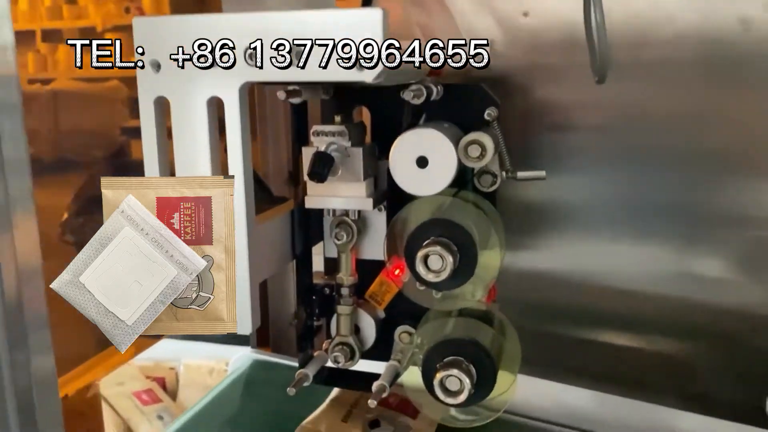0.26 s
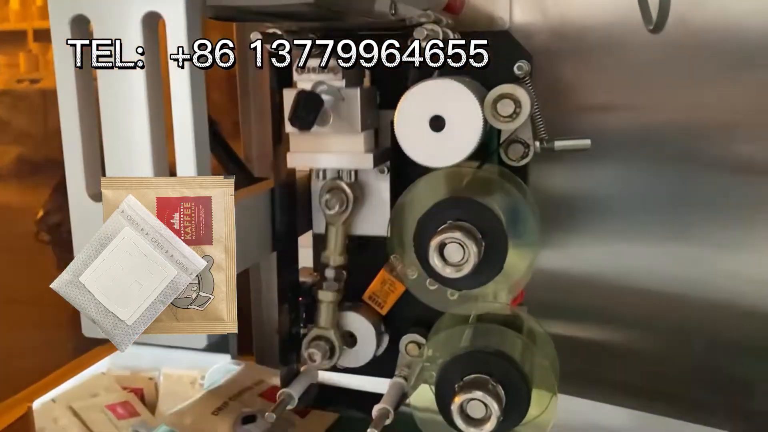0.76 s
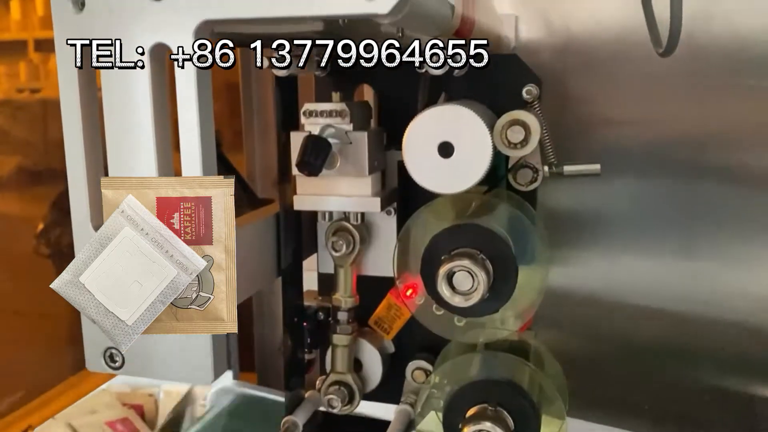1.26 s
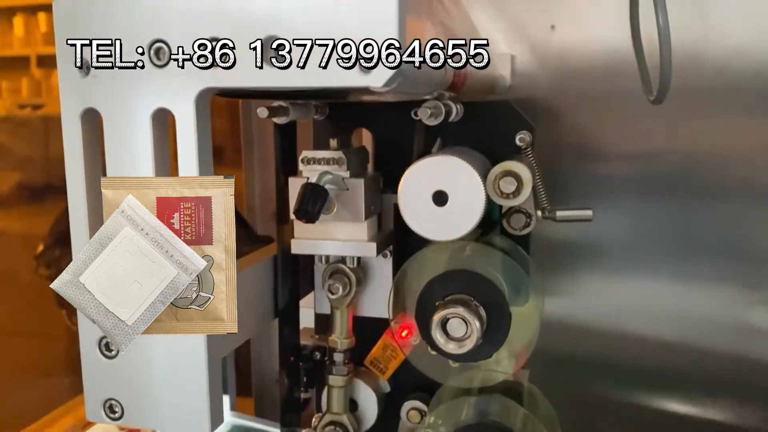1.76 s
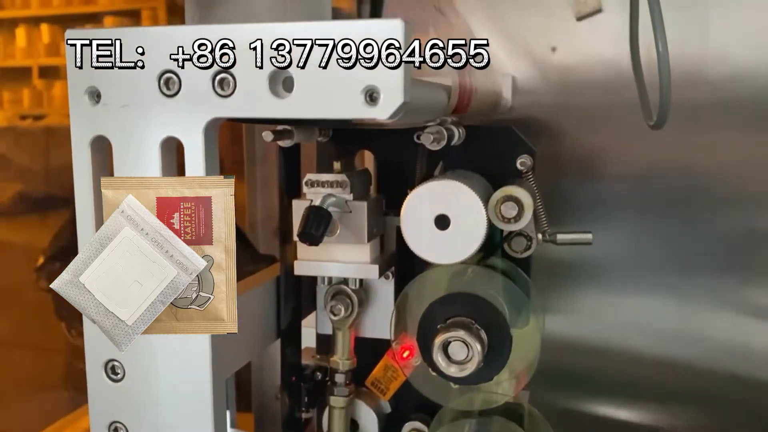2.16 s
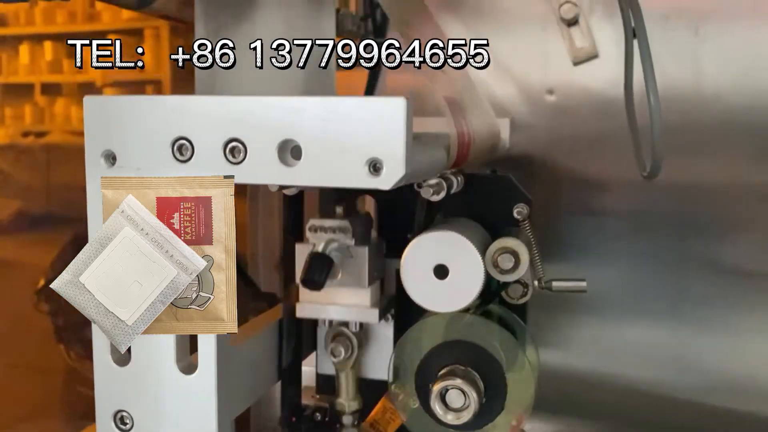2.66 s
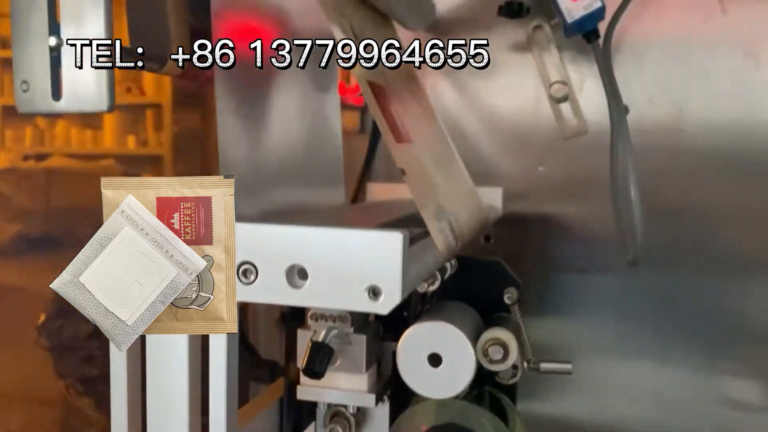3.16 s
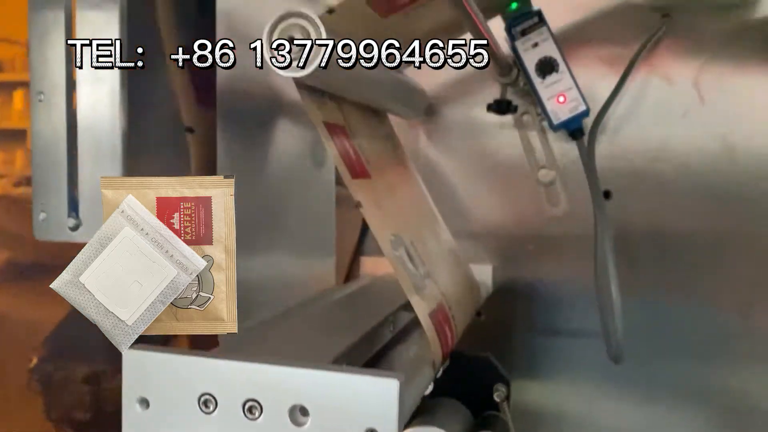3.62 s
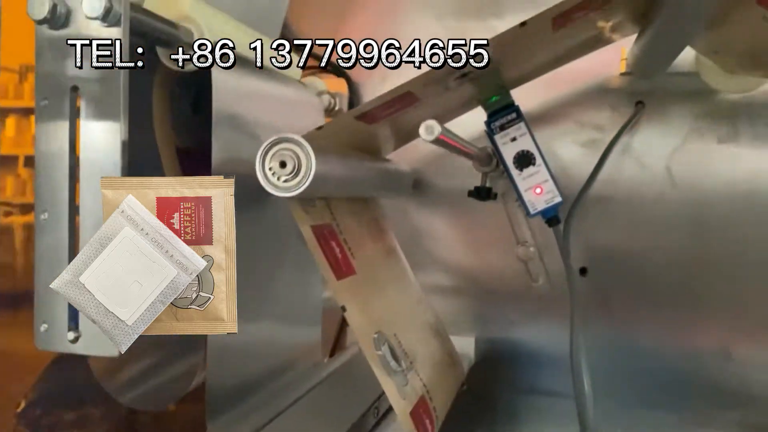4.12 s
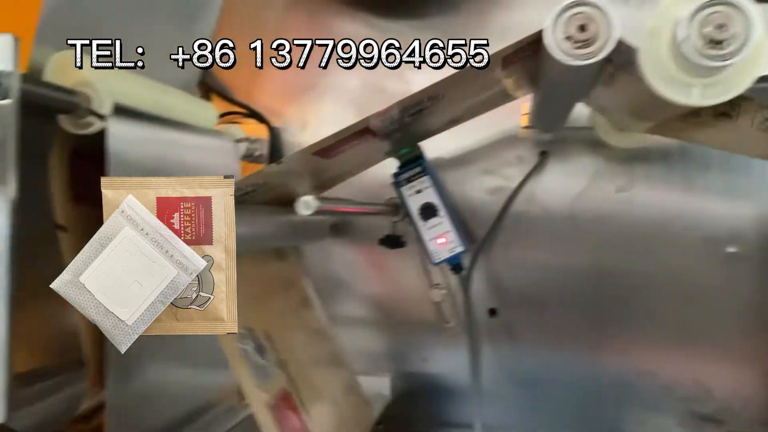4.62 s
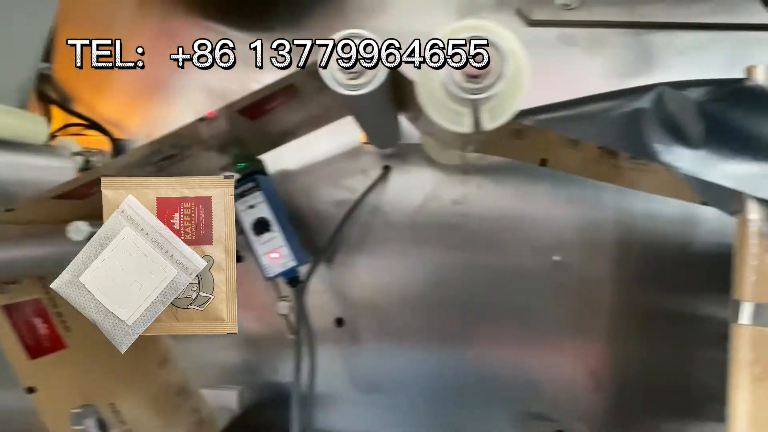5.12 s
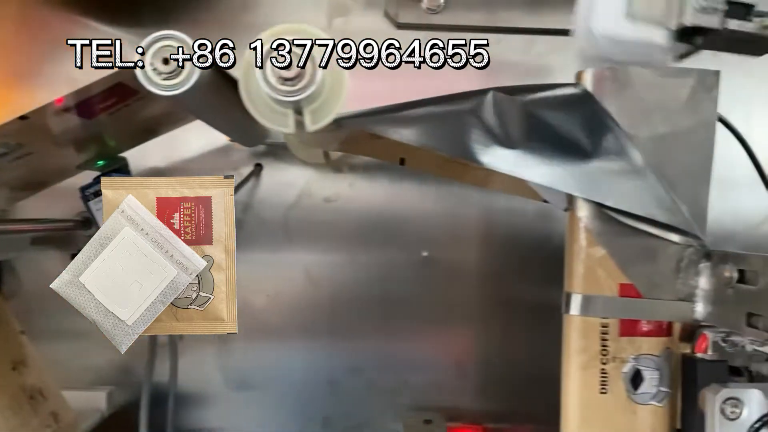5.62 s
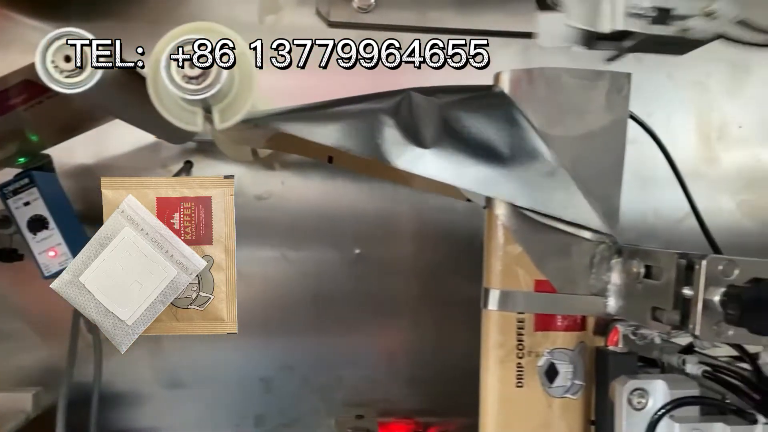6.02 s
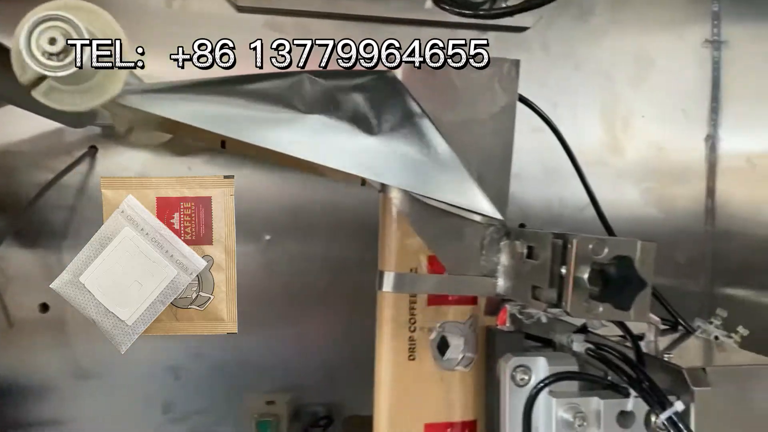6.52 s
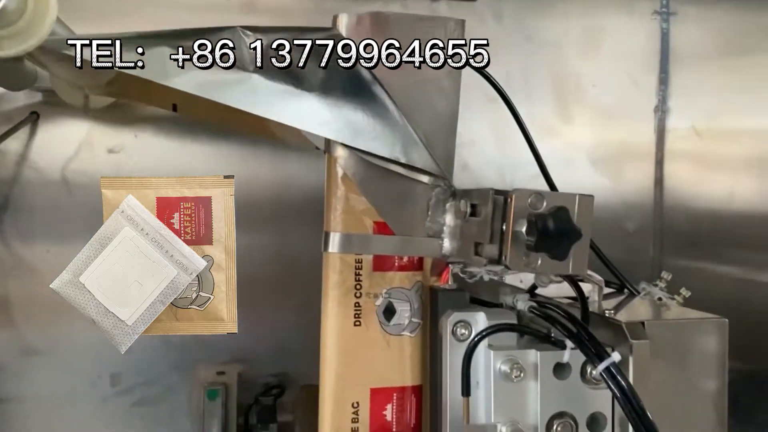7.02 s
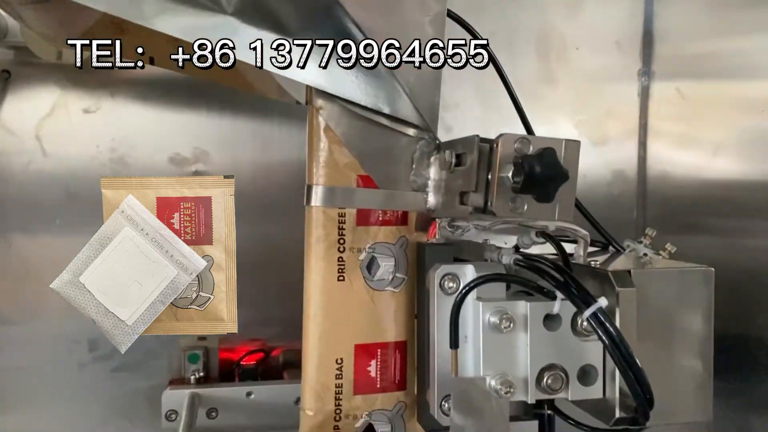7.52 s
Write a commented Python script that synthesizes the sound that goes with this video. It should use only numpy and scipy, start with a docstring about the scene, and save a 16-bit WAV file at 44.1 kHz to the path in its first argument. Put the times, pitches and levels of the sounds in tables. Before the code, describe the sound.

Close to a sachet packing machine in a workshop, a fixed cycle repeats about every 1.6 seconds. Metal jaws thump shut with a brief rattle, film rasps forward and ends in a tiny high squeal, a dry latch clack runs into a clattering linkage, then a cutter chops. Low motor hum and rumble continue beneath, with scattered light clicks and a soft air jet after every second cut.

```python
"""Sachet packaging machine

Close by in a workshop, one cycle every 1.6 s: the sealing jaws thump shut, paper film is dragged along
with a brief squeal, a latch clacks, a linkage rattles back and the cutter chops.
The drive hums and rumbles with its load; every second cycle an air jet hisses.
Blows are shaped noise plus decaying modes, with reverberation; film, drive and air are coloured noise,
hum and squeal are wavering sines."""
import sys
import numpy as np
from scipy import signal
from scipy.fft import rfft, irfft
from scipy.io import wavfile
from scipy.ndimage import uniform_filter1d

SR = 44100
rng = np.random.default_rng(int(sys.argv[2]) if len(sys.argv) > 2 else 0)


def materialize(psi):
    """Save the field psi as 16-bit PCM at rate SR to the path in sys.argv[1].

    A 1-D psi becomes a single channel; in a 2-D psi each row is a channel.
    """
    bounded = np.clip(np.atleast_2d(psi).T, -1, 1)
    quanta = np.round(bounded * 32767).astype(np.int16)
    wavfile.write(sys.argv[1], SR, quanta)


N = 343035
T = np.arange(N) / SR
HZ = np.fft.rfftfreq(N, 1 / SR)


def amp(db):
    """Decibels to gain."""
    return 10 ** (np.asarray(db) / 20)


def unit(x):
    """Scales to rms 1."""
    return x / np.sqrt(np.mean(x ** 2) + 1e-20)


def read(points, hz):
    """Interpolates a table on a log-frequency axis."""
    f, value = np.transpose(points)
    return np.interp(np.log(hz + 1), np.log(f + 1), value)


def drift(rate_hz):
    """Random wander of rms 1, mostly below rate_hz."""
    return unit(irfft(rfft(rng.standard_normal(N)) / (1 + (HZ / rate_hz) ** 4), N))


# left-right likeness, rippled by microphone spacing: f/Hz, likeness (limited to about -1..1 in use)
LIKENESS = [(30, .95), (70, 1), (130, 0.86), (280, 0.76), (450, 0.35), (750, 0.28), (1200, 0.21),
            (1580, -0.18), (2100, 0.17), (2500, .6), (3000, 0.1), (3900, -0.041), (5000, 0.29),
            (6100, 0.073), (6650, 0.86), (7400, 0.21), (8100, -1.34), (8750, -1.2), (9600, 0),
            (10050, 0.68), (10450, 1)]


def spread(mid, side):
    """Mid and side spectra to left and right, their balance set by the likeness at each frequency."""
    same = np.clip(read(LIKENESS, HZ), -.99, .99)
    mid = mid * np.sqrt((1 + same) / 2)
    side = side * np.sqrt((1 - same) / 2)
    return irfft([mid + side, mid - side], N)


def noise(colour, grit_db=0):
    """Coloured stereo noise of rms 1; grit makes it a crowd of tiny contacts of uneven size."""
    grains = rng.standard_normal((2, N)) * amp(grit_db * drift(550))
    mid, side = rfft(grains) * amp(read(colour, HZ))
    return unit(spread(mid, side))


def resonant(x, peaks, size=500):
    """Steel parts lift a few clear resonances and ripple the spectrum with countless small ones."""
    ripple = rng.standard_normal((2, len(HZ)))
    ripple_db = 2.2 * unit(uniform_filter1d(uniform_filter1d(ripple, size), size))
    lift_db = sum(db / (1 + (2 * (HZ - hz) / width_hz) ** 2) for hz, width_hz, db in peaks)
    return unit(irfft(rfft(x) * amp(lift_db + ripple_db), N))


def patchy(x, depth_db, size=9):
    """Contact wanders: patches of the spectrum swell and fade for a few hundredths of a second."""
    z = signal.stft(x, SR, nperseg=512)[2]
    patches = rng.standard_normal(z.shape[1:])
    patches = unit(uniform_filter1d(uniform_filter1d(patches, size, 0), size, 1))
    return unit(signal.istft(z * amp(depth_db * patches), SR, nperseg=512)[1][:, :N])


def bursts(rows, delay_s, rise_s, t60_s):
    """Level of a train of blows: each swells while the parts meet, then dies away."""
    level = np.zeros(N)
    for s, db in rows:
        span = slice(max(int((s - .04) * SR), 0), int((s + .5) * SR))
        t = T[span] - s - delay_s - rise_s
        fall_db = np.where(t < 0, -13 * t / rise_s, 60 * t / t60_s)
        level[span] += amp(db - fall_db)
    return level


def ring(rows, modes, delay_s, rise_s):
    """Each blow rings decaying sine modes, their left-right phase skew set by the likeness."""
    t = T[:SR // 2]
    body = np.zeros((2, len(t)))
    for k, (hz, db, t60_s) in enumerate(modes):
        skew = (-1) ** k * np.arccos(np.clip(read(LIKENESS, hz), -1, 1)) * np.array([[.5], [-.5]])
        body += amp(db - 60 * t / t60_s) * np.sin(2 * np.pi * hz * t + skew)
    body *= 1 - np.exp(-(t / rise_s) ** 2)
    blows = np.zeros(N)
    for s, db in rows:
        blows[int(np.clip((s + delay_s) * SR, 0, N - 1))] += amp(db)
    return signal.oaconvolve(blows[None], body, axes=1)[:, :N]


def held(rows, ramp_s):
    """Level that ramps up around each start, holds, and ramps down around each end."""
    return sum(amp(db) * np.clip(np.minimum(T - start, end - T) / ramp_s + .5, 0, 1)
               for start, end, db in rows)


def through_cycle(table):
    """Repeats the columns of a one-cycle table, starting anew each time the jaws shut."""
    shut = np.transpose(JAWS)[0]
    period = np.mean(np.diff(shut))
    starts = np.append(shut[0] - period, shut)
    since = T - starts[np.searchsorted(starts, T, side="right") - 1]
    s, *columns = np.transpose(table)
    return [np.interp(since, s, column, period=period) for column in columns]


FEED_WAIT_S, FEED_S, FEED_DB = 0.11, 0.18, -24  # after the jaws shut
DRAW_LEAD_S, DRAW_S, DRAW_DB = 0.13, 0.16, -24.5  # up to the cut


def pulls():
    """The two film pulls of every cycle, as rows of start/s, end/s, level/dB."""
    feeds = [(s + FEED_WAIT_S, s + FEED_WAIT_S + FEED_S, FEED_DB) for s, _ in JAWS]
    draws = [(s - DRAW_LEAD_S, s - DRAW_LEAD_S + DRAW_S, DRAW_DB) for s, _ in CUTS]
    return feeds + draws


# motor hum: mean f/Hz, level/dB before swell and waver
HUM = [(98, -34), (172, -38), (286, -47.5)]


def hum(swell_db):
    """Motor tones, wavering in pitch and level, swelling and fading through each cycle."""
    out = 0
    for hz, db in HUM:
        level_db = db + swell_db + 2.04 * drift(8.2)
        turns = np.cumsum(hz + 2.75 * drift(10.17)) / SR
        out = out + amp(level_db) * unit(np.sin(2 * np.pi * turns))
    return out


THROB_WAIT_S, THROB_S, THROB_HZ, THROB_SAG_PER_S, THROB_DB = 0.053, .032, 66.2, 2.5, -20


def throbs():
    """The feed drive throbs low once in each pull, its pitch sagging as the feed slows."""
    out = np.zeros(N)
    for start, _, _ in pulls():
        near = abs(T - start - THROB_WAIT_S) < 4 * THROB_S
        t = T[near] - start - THROB_WAIT_S
        turns = np.cumsum(THROB_HZ * np.exp(-THROB_SAG_PER_S * t)) / SR + rng.random()
        out[near] += amp(THROB_DB) * np.exp(-(t / THROB_S) ** 2) * np.sin(2 * np.pi * turns)
    return out


# load through one cycle: t/s after the jaws shut, rumble level/dB, gear growl level/dB, hum swell/dB
CYCLE_LOAD = [(0.0, -25, -36.5, 1.5), (0.28, -26, -25.5, -1), (0.36, -26.5, -42, -3.5),
              (0.5, -26, -29.5, 1), (0.74, -24, -37, -2), (0.9, -26, -33, 5.5), (1.15, -29.5, -43.5, 1.5),
              (1.31, -28, -45.5, 2.5), (1.41, -22.5, -27.5, 6), (1.5, -30.5, -48, 1)]
# the drive labours and the frame shudders: t/s at the loudest, length/s, level/dB
SHUDDERS = [(0.625, 0.019, -21), (1.452, 0.036, -18.5), (2.213, 0.083, -15.5), (2.375, 0.059, -20),
            (2.713, 0.27, -24.5), (3.695, .06, -21.5)]
# rumble and growl spectra: f/Hz, relative density/dB per Hz
RUMBLE_COLOUR = [(22, -38), (40, -16), (68, 2.5), (100, 7.5), (130, -2.5), (190, 0.5), (250, -20.5),
                 (500, -32)]
GROWL_COLOUR = [(100, -6), (200, -6), (290, -2), (400, -13), (800, -19.5), (2000, -46)]


def drive():
    """Hum over the rumble and growl of gears and cams, which follow the load and swell in a shudder."""
    rumble_db, growl_db, swell_db = through_cycle(CYCLE_LOAD)
    shudder = sum(amp(db) * np.exp(-((T - s) / length_s) ** 2) for s, length_s, db in SHUDDERS)
    rumble = np.hypot(amp(rumble_db), shudder) * noise(RUMBLE_COLOUR)
    growl_level = np.hypot(amp(growl_db), amp(-11.5) * shudder) * amp(1.06 * drift(32))
    growl = growl_level * noise(GROWL_COLOUR)
    return hum(swell_db) + throbs() + rumble + growl


# sliding over the guides in one cycle: t/s after the jaws shut, hiss level/dB, sizzle level/dB
CYCLE_SLIDE = [(0.0, -30.5, -33), (0.22, -30.5, -38.5), (0.36, -34.5, -36), (0.5, -31.5, -36),
               (0.8, -34.5, -35), (0.93, -33, -33), (1.12, -36.5, -39), (1.31, -32.5, -33),
               (1.385, -31.5, -30.5), (1.47, -32, -37)]
# air jets after every second cut: start/s, end/s, level/dB
JETS = [(2.66, 3.12, -27.5), (5.92, 6.4, -27.5)]
# rasp, hiss and sizzle spectra: f/Hz, relative density/dB per Hz
FILM_COLOUR = [(150, -17), (350, 2.5), (540, -3.5), (750, 1.5), (1800, -1.5), (2700, 3.5), (3900, 2),
               (5000, 0.5), (5400, -5), (5800, 1.5), (7000, -5.5), (8800, 1.5), (11500, -7.5)]
HISS_COLOUR = [(300, -3), (1000, 2), (2700, 2.5), (4500, 2), (5400, -2.5), (5800, 1), (8500, -17.5),
               (10000, -41)]
SIZZLE_COLOUR = [(5000, 0), (8300, 19), (9300, 16.5), (11300, 14.5), (12000, -20)]
# rasp resonances: f/Hz, width/Hz, lift/dB
FILM_PEAKS = [(272, 20, 10), (538, 23, 15), (1140, 270, 4), (2560, 230, 3.7), (3760, 250, 3),
              (5200, 120, 3), (7000, 300, 3.3)]
CRINKLE_START_S, CRINKLE_END_S, CRINKLE_DB = 2.29, 2.7, -28.5  # one long crinkle of the paper


def film():
    """Paper film rasps over steel in each pull; softer hiss, air jets and fine sizzle go on between."""
    hiss_db, sizzle_db = through_cycle(CYCLE_SLIDE)
    jets = held(JETS, ramp_s=0.27)
    crinkle = held([(CRINKLE_START_S, CRINKLE_END_S, CRINKLE_DB)], ramp_s=0.049)
    steel = resonant(noise(FILM_COLOUR, grit_db=0.5), FILM_PEAKS)
    rasp = patchy(steel, depth_db=1.2) * held(pulls(), ramp_s=0.024)
    hiss = patchy(noise(HISS_COLOUR, grit_db=1.0), depth_db=2.5) * np.hypot(amp(hiss_db), jets)
    fibres = patchy(noise(SIZZLE_COLOUR, grit_db=0.5), depth_db=3)
    sizzle = fibres * np.hypot(amp(sizzle_db), crinkle) * amp(0.98 * drift(12))
    return (rasp + hiss + sizzle) * amp(1.26 * drift(18.6))


# steady air spectrum: f/Hz, relative density/dB per Hz
AIR_COLOUR = [(100, -2.5), (400, 11.5), (1000, 9.5), (2000, 6), (4000, -7), (8000, 0), (12000, -27)]


def air():
    """Faint steady noise of the air."""
    return amp(-37.5) * noise(AIR_COLOUR)


# jaws shut: t/s, force/dB
JAWS = [(0.0748, 1.5), (1.6486, 2), (3.2426, 1), (4.8368, 0.5), (6.4157, 0.5)]
# jaws and frame: f/Hz, level/dB, t60/s
JAW_MODES = [(174.2, -18, 0.51), (199.4, -15, 0.35), (222, -1, 0.056), (255.5, -14.5, 0.35),
             (281.5, -17, 0.38), (434, -20.5, 0.16), (1063, -20, 0.1), (1400, -29, 0.17),
             (2010, -17, 0.037), (8870, -12, 0.051), (10200, -13, 0.03), (11600, -35, 0.05)]
# thin plate shaken a moment later: f/Hz, level/dB, t60/s
PLATE_MODES = [(543, -21, 0.36), (841, -20, .19), (863, -19, 0.18)]
# dense ringing of jaws, and of loose parts and linkage: f/Hz, relative density/dB per Hz
JAW_COLOUR = [(150, -24), (400, -5), (900, -4), (2000, -2), (3500, -11), (5500, -13.5), (9000, -14.5),
              (12000, -8.5)]
RATTLE_COLOUR = [(120, -9.5), (300, 1), (420, -9.5), (580, 4), (800, 3.5), (1400, -2.5), (2200, -10.5),
                 (3100, -8), (5500, -22), (9000, -8), (12000, -43)]
# resonances of loose parts and linkage: f/Hz, width/Hz, lift/dB
RATTLE_PEAKS = [(534, 47, 11), (706, 35, 1.6), (887, 63, 9.2), (1180, 130, 2.5)]


def jaws():
    """Metal meets metal, the frame thumps, and the loose parts and a plate answer just after."""
    metal = resonant(noise(JAW_COLOUR, grit_db=4), [])
    crack = amp(-13.5) * bursts(JAWS, delay_s=-0.0053, rise_s=0.0017, t60_s=0.13) * metal
    loose = resonant(noise(RATTLE_COLOUR, grit_db=-0.5), RATTLE_PEAKS)
    chatter = amp(-18.5) * bursts(JAWS, delay_s=0.0072, rise_s=0.019, t60_s=0.18) * loose
    plate = ring(JAWS, PLATE_MODES, delay_s=.014, rise_s=.004)
    thump = ring(JAWS, JAW_MODES, delay_s=.001, rise_s=0.0032)
    return crack + chatter + plate + thump


# cams and guides: t/s, level/dB, treble tilt/dB per octave
CLICKS = [(0.252, -17, 2), (0.33, -19.5, 3.5), (1.266, -23.5, 1), (1.426, -28.5, 8), (1.461, -19, 2.5),
          (1.604, -24, 2), (1.785, -21, 4), (1.917, -39, 0), (2.168, -20.5, 0.5), (3.052, -20, 0.5),
          (3.506, -24, 5), (4.405, -23.5, 1.5), (4.452, -24, 1), (4.598, -17, 3), (4.648, -18, 1),
          (4.79, -25, 0.5), (5.337, -18, 1), (6.025, -29, -1.5), (6.197, -21, 5.5), (6.227, -19, -1.5),
          (7.613, -23, 0), (7.766, -23, 4)]
# click spectrum: f/Hz, relative density/dB per Hz
CLICK_COLOUR = [(120, -36), (300, 5.5), (800, 17), (1400, 13), (2500, 8.5), (5000, 5), (8000, 4.5),
                (10500, 0.5), (12000, -33)]
# click resonances: f/Hz, width/Hz, lift/dB
CLICK_PEAKS = [(1157, 180, 9.9), (1570, 290, 6.1), (2570, 350, 6.5), (4430, 130, 2.5)]


def clicks():
    """Light knocks of the same metalwork, each tilted brighter or duller about 2500 Hz."""
    metal = resonant(noise(CLICK_COLOUR, grit_db=-0.5), CLICK_PEAKS)
    out, size = np.zeros((2, N)), 8192
    octaves = np.log2(np.maximum(np.fft.rfftfreq(size, 1 / SR), 300) / 2500)
    for s, db, tilt_db in CLICKS:
        first = int(s * SR) - size // 20
        span = slice(first, first + size)
        level = bursts([(s, db)], delay_s=0, rise_s=0.0018, t60_s=0.13)[span]
        tilted = irfft(rfft(metal[:, span], size) * amp(tilt_db * octaves))
        out[:, span] += level * tilted[:, :len(level)]
    return out


# squeal at the end of each pull after the jaws shut: t/s at the loudest, mean f/Hz, level/dB
SQUEALS = [(0.304, 9720, -22), (1.876, 9800, -15.5), (3.474, 9700, -22.5), (5.055, 9780, -24.5),
           (6.648, 9660, -30)]


def squeal():
    """Stick and slip of the film: a short whistle, rough in pitch and level."""
    s, hz, _ = np.transpose(SQUEALS)
    level = sum(amp(db) / (1 + ((T - at) / 0.017) ** 4) for at, _, db in SQUEALS)
    turns = np.cumsum(np.interp(T, s, hz) + 70 * drift(146)) / SR
    flutter = amp(3 * drift(120))
    return level * unit(np.sin(2 * np.pi * turns) * flutter)


# latch clacks: t/s, force/dB
LATCHES = [(0.729, -3.5), (2.317, -4), (3.9156, -4.5), (5.4895, -4.5), (7.0804, -5.5)]
# latch: f/Hz, level/dB, t60/s
LATCH_MODES = [(342, -39, 0.32), (604, -25, 0.24), (740, -21, 0.095), (1355, -26, 0.23), (1890, -26, 0.17)]
# dense ringing: f/Hz, relative density/dB per Hz
LATCH_COLOUR = [(150, -0.5), (400, -0.5), (1000, 1.5), (2200, -4), (3800, -4), (6000, -12.5), (9500, -11),
                (12000, -16.5)]
# resonances: f/Hz, width/Hz, lift/dB
LATCH_PEAKS = [(760, 32, 4.6), (1490, 50, 6.8), (1770, 60, 5.6), (2460, 97, 3.1), (3660, 80, 3.8),
               (4530, 100, 4)]


def latch():
    """A bright, dry clack: a noise burst plus ringing modes."""
    metal = resonant(noise(LATCH_COLOUR, grit_db=-3.5), LATCH_PEAKS)
    clack = amp(-8.5) * bursts(LATCHES, delay_s=-0.0043, rise_s=0.0076, t60_s=0.12) * metal
    return clack + ring(LATCHES, LATCH_MODES, delay_s=0.00365, rise_s=0.0016)


# linkage rattles back: t/s, force/dB
RATTLES = [(0.778, 1), (2.355, 2), (3.953, 0), (5.533, 0), (7.126, 1.5)]
# linkage: f/Hz, level/dB, t60/s
LINK_MODES = [(296, -17, 0.33), (330, -8, 0.046), (362, -25, 0.25), (470, -3.5, 0.028), (569, -33.5, 0.39),
              (643, -18.5, 0.093), (705, -18.5, 0.22), (868, -35, 0.24), (1208, -26.5, 0.2),
              (1453, -28, 0.066)]


def linkage(count=4):
    """The rod bounces in its play a few times, ringing dully."""
    gaps_s = .008 * (np.arange(count) + rng.uniform(0, 0.924, (len(RATTLES), count)))
    bounces = [(s + gap_s, db - 6.5) for (s, db), row in zip(RATTLES, gaps_s) for gap_s in row]
    rod = resonant(noise(RATTLE_COLOUR, grit_db=2), RATTLE_PEAKS)
    clatter = amp(-16.5) * bursts(RATTLES, delay_s=-0.0034, rise_s=0.012, t60_s=0.26) * rod
    return clatter + ring(bounces, LINK_MODES, delay_s=0.00294, rise_s=0.0021)


# cutter chops: t/s, force/dB
CUTS = [(1.0382, -4), (2.6272, -4), (4.225, -4), (5.8027, -3), (7.3931, -4)]
# cutter block: f/Hz, level/dB, t60/s
CUTTER_MODES = [(109, -33, 0.17), (146.3, 3.5, 0.077), (170.4, -13, 0.61), (572, -11, 0.057),
                (1090, 0, 0.031), (3300, -25, 0.046)]
# dense ringing: f/Hz, relative density/dB per Hz
CUT_COLOUR = [(150, -7), (400, -1), (1200, 0), (2200, -2), (3300, -10.5), (5500, -7.5), (9000, -13),
              (12000, -14)]
# resonances: f/Hz, width/Hz, lift/dB
CUT_PEAKS = [(1080, 120, -20), (1800, 270, 2), (3287, 260, 15), (4420, 160, 8), (6600, 200, 1)]


def cutter():
    """The blade snaps onto the film and crunches through it, then its block hits the stop."""
    blade = resonant(noise(CUT_COLOUR, grit_db=0.5), CUT_PEAKS)
    snap = amp(-8.0) * bursts(CUTS, delay_s=0, rise_s=0.0011, t60_s=0.04)
    crunch = amp(-12.5) * bursts(CUTS, delay_s=0.0024, rise_s=0.0044, t60_s=0.12)
    stop = ring(CUTS, CUTTER_MODES, delay_s=0.0045, rise_s=0.0047)
    return (snap + crunch) * blade + stop


# workshop reverberation: f/Hz, t60/s
ROOM = [(150, 0.17), (800, 0.21), (4000, 0.29), (11000, 0.16)]


def room(x):
    """Diffuse reflections after 8 ms, each band dying at its own speed."""
    taps = rng.standard_normal((2, SR // 2)) * (T[:SR // 2] > .008)
    hz, t, z = signal.stft(taps, SR, nperseg=256)
    decay = amp(-60 * t / read(ROOM, hz)[:, None])
    tail = signal.istft(z * decay, SR, nperseg=256)[1]
    tail = tail / np.linalg.norm(tail[0])
    mid, side = rfft(signal.fftconvolve(x, tail, axes=1)[:, :N])
    return spread(mid, side)


def scene():
    """The blows and their reflections over the running sounds."""
    running = drive() + film() + air()
    blows = jaws() + clicks() + latch() + linkage() + cutter()
    return running + squeal() + blows + amp(-10) * room(blows)


EDGE_HZ = 11780


def record(dry):
    """The left microphone is 0.5 dB louder; peaks beyond 0.9 overload; then a low-pass band limit."""
    sound = np.clip(dry * amp([[.25], [-.25]]), -.9, .9)
    lowpass = signal.firwin(401, EDGE_HZ, window=("kaiser", 9), fs=SR)
    return signal.oaconvolve(sound, lowpass[None], "same")


dry = scene()
out = record(dry)
materialize(out)
```